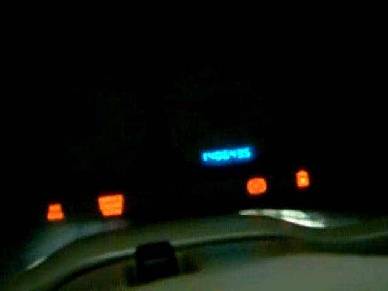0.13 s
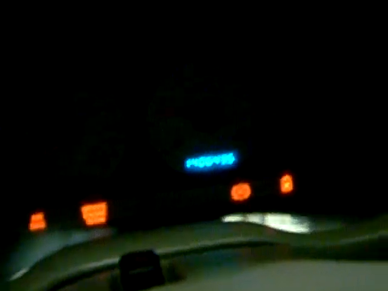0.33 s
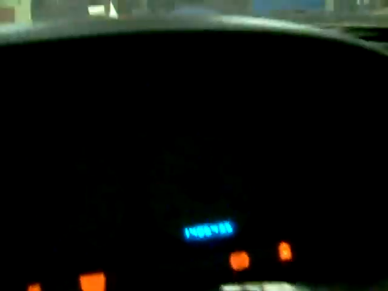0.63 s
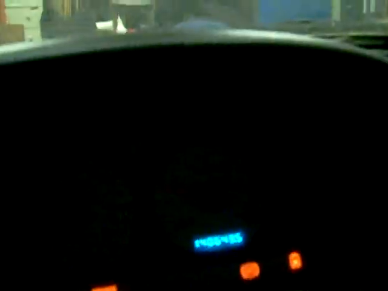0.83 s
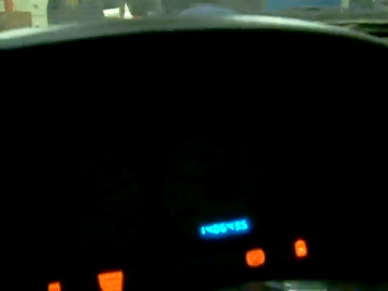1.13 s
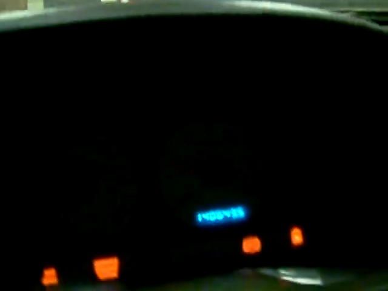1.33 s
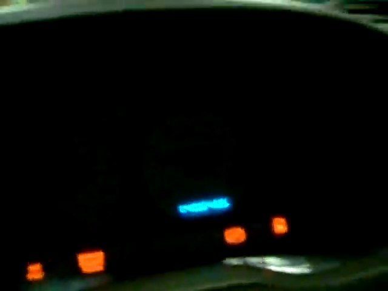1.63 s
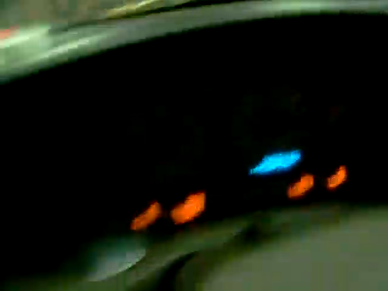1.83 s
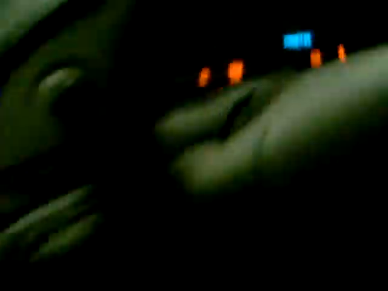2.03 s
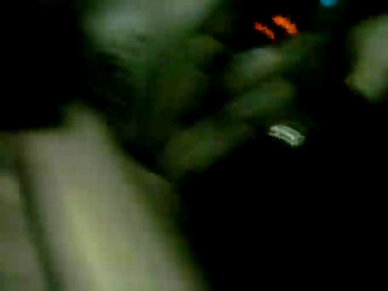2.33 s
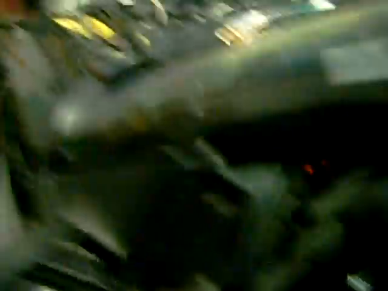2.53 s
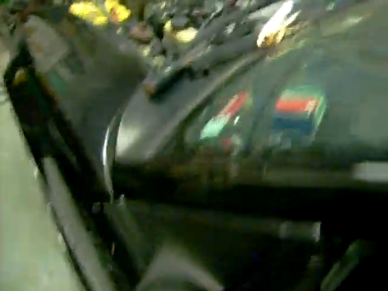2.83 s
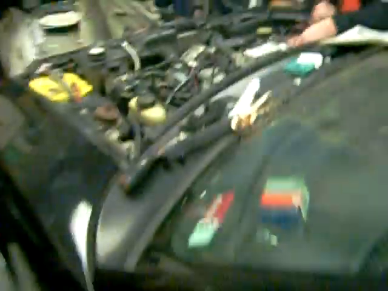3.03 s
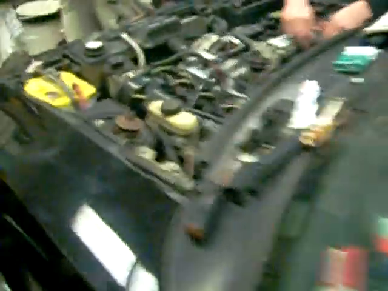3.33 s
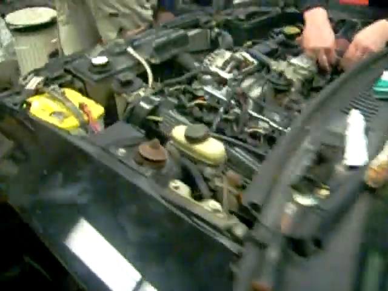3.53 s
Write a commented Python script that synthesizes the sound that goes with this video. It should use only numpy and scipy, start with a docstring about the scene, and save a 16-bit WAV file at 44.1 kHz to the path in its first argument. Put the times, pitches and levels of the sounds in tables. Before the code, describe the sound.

Car engine running at a fast idle, muffled inside the cabin, then revved and clearer outside.

```python
"""Four-cylinder engine, idling and revved

A car engine hunts at a fast idle and is revved once. Its low harmonics boom in the cabin, firing
pulses force the resonances of the exhaust and block, and turbulent air adds a broadband rush.
The microphone moves out of the door toward the open engine bay, where all but the boom and
a few fading tones sound louder and brighter."""
import sys
import numpy as np
from scipy import signal
from scipy.fft import rfft, irfft, next_fast_len
from scipy.io import wavfile
from scipy.ndimage import uniform_filter1d

SR = 44100
rng = np.random.default_rng(int(sys.argv[2]) if len(sys.argv) > 2 else 0)


def generate_wav(signal):
    """Clip the signal to [-1, 1] and save it as 16-bit WAV at the path in sys.argv[1]."""
    frames = np.transpose(np.atleast_2d(signal))
    scaled = np.clip(frames, -1, 1) * 32767
    pcm = np.round(scaled).astype(np.int16)
    wavfile.write(sys.argv[1], SR, pcm)


N = 161847
T = np.arange(N) / SR

# crankshaft speed: t/s, speed/rpm
ENGINE_SPEED = [(0, 1326), (.25, 1318), (.68, 1442), (1.08, 1448), (1.47, 1362), (2.0, 1417), (2.15, 1390),
                (2.47, 1283), (2.65, 1295), (2.8, 1450), (3.0, 1790), (3.1, 1920), (3.22, 1955),
                (3.4, 1750), (3.53, 1570), (3.67, 1580)]
def engine_cycles():
    """Phase is the integral of speed; one four-stroke cycle takes two turns."""
    return np.cumsum(curve(ENGINE_SPEED)) / (2 * 60) / SR


# firing strength of each cylinder: relative level/dB
CYLINDERS = [-2, -4, -2.5, -8]
def firings(cycles, spread_db=3.5, jitter_s=0.00033):
    """Impulse excitation: one pressure pulse per firing, uneven in force and timing."""
    onsets = np.flatnonzero(np.diff(np.floor(cycles * len(CYLINDERS)), prepend=-1))
    force, timing = rng.standard_normal((len(onsets), 2)).T
    onsets = np.clip(onsets + (jitter_s * SR * timing).astype(int), 0, N - 1)
    pulses = np.zeros(N)
    pulses[onsets] = amp(np.resize(CYLINDERS, len(onsets)) + spread_db * force)
    return unit(pulses)


# harmonics of the cycle rate: order, relative level/dB
BOOM_HARMONICS = [(4, -11), (5, 0), (6, -16), (7, -24), (8, -18), (10, -19), (12, -17), (15, -24),
                  (17, -26)]
# cabin boom: t/s, level/dB
BOOM_LEVEL = [(0, -12.5), (.35, -14), (.8, -17.5), (1.25, -17), (1.62, -15.3), (2.1, -17.3), (2.4, -22.5),
              (2.7, -23), (2.82, -19.5), (3.0, -28), (3.67, -34)]
def cabin_boom(cycles, spread_db=1.4):
    """Beating: adjacent low harmonics beat once a cycle, and no two cycles are equally strong."""
    tones = sum(amp(db) * np.sin(2 * np.pi * order * cycles) for order, db in BOOM_HARMONICS)
    count = int(cycles[-1]) + 2
    lope = amp(spread_db * np.interp(cycles, np.arange(count), rng.standard_normal(count)))
    return amp(curve(BOOM_LEVEL)) * unit(tones * lope)


# lowest exhaust resonance, surging in the rev: t/s, relative level/dB
DRONE_LEVEL = [(0, -25), (.95, -22.5), (1.5, -25.5), (1.95, -23), (2.65, -25), (2.73, -15.5), (2.86, -14.5),
               (2.95, -8.5), (3.01, -12), (3.06, -19), (3.1, -7.5), (3.15, -15), (3.24, -9), (3.3, -20),
               (3.42, -21), (3.52, -17.5), (3.61, -13.5), (3.67, -15.5)]
# pitch of the drone outside: t/s, f/Hz
HUM_PITCH = [(2.6, 134), (2.95, 134), (3.22, 131.6), (3.5, 134.2), (3.67, 130.8)]
def exhaust_drone(drive, cycles, outside, throb_depth=0.54, gain_db=-1.96):
    """Forced resonance: the lowest mode throbs once a cycle in the cabin and is a firm hum outside."""
    mode = steady(ring(drive, hz=130.8, width=14))
    hum = unit(np.sin(2 * np.pi * np.cumsum(curve(HUM_PITCH)) / SR))
    drone = steady((1 - outside) * mode + outside * hum, size=5000)
    throb = 1 + throb_depth * (1 - outside) * np.cos(2 * np.pi * cycles)
    return amp(curve(DRONE_LEVEL) + gain_db) * drone * throb


# pipe modes: f/Hz, stage bandwidth/Hz, share of the swing in engine speed that f follows
PIPE_MODES = [(250.6, 12.6, 0.16), (375.2, 13.9, 0.11), (497, 8.2, 0.033)]
# each mode swells and fades as the microphone moves: t/s, level/dB
LOW_MODE_LEVEL = [(0, -25.5), (.25, -27.5), (.35, -24), (1.5, -31), (2.35, -31), (2.53, -26), (2.65, -30),
                  (3.0, -22), (3.2, -23), (3.4, -30), (3.67, -40)]
MID_MODE_LEVEL = [(0, -37), (.7, -36), (1.25, -35), (1.5, -30.5), (2.1, -40), (2.22, -27), (2.55, -29),
                  (2.63, -35.5), (2.72, -24), (2.95, -25), (3.13, -23.5), (3.27, -32), (3.48, -33),
                  (3.6, -25), (3.67, -31.5)]
HIGH_MODE_LEVEL = [(0, -41.5), (.9, -40), (1.28, -35.5), (1.5, -43.5), (1.75, -33), (2.12, -30.5),
                   (2.25, -35), (2.7, -49), (2.92, -33), (3.2, -29.5), (3.42, -45), (3.6, -23), (3.67, -29)]
def exhaust_pipe(drive):
    """Air-column resonance: three modes ring, rising slightly in pitch with engine speed."""
    rpm = curve(ENGINE_SPEED)
    swing = rpm / np.median(rpm) - 1
    levels = (LOW_MODE_LEVEL, MID_MODE_LEVEL, HIGH_MODE_LEVEL)
    pipe = np.zeros(N)
    for level, (hz, width, follow) in zip(levels, PIPE_MODES):
        mode = gliding_ring(drive, hz * (1 + follow * swing), width)
        pipe += amp(curve(level)) * steady(mode, size=5000)
    return pipe


# growl, heard mainly outside: t/s, level/dB
GROWL_LEVEL = [(2.4, -43), (2.7, -38), (2.87, -19), (3.03, -38), (3.3, -35), (3.55, -21), (3.67, -36)]
def growl(cycles):
    """Second harmonic: a tone at twice the firing rate."""
    return amp(curve(GROWL_LEVEL)) * unit(np.cos(2 * np.pi * 2 * len(CYLINDERS) * cycles))


# engine noise, relative band levels: t/s, low mids/dB, high mids/dB, treble/dB
NOISE_BANDS = [(0.06, -38.5, -42.5, -40), (0.11, -38.5, -40, -41.5), (0.14, -41.5, -42.5, -42.5),
               (0.68, -42, -43, -40), (1.49, -41.5, -43.5, -42.5), (2.21, -39.5, -43.5, -38),
               (2.6, -32.5, -35.5, -32), (2.88, -25, -28, -28.5), (3.01, -28.5, -33, -31.5),
               (3.28, -31, -41, -34.5), (3.43, -36, -40.5, -33.5), (3.46, -29.5, -34.5, -29.5),
               (3.61, -28.5, -33.5, -28), (3.63, -29, -38, -28.5)]
# noise spectra inside and outside: f/Hz, relative spectral level/dB
CABIN_SPECTRUM = [(350, -7), (600, 2), (800, -4.5), (960, -7), (1150, -3), (1430, -9.5), (1600, -14),
                  (1800, -14), (2150, -20.5), (2500, -15), (3300, -10), (3900, -9), (4400, -19.5),
                  (5340, -25), (6940, -35), (8500, -41), (11000, -58)]
BAY_SPECTRUM = [(350, -9), (600, -0.5), (810, -13), (1030, -8.5), (1380, -8.5), (1670, -9), (1930, -5.5),
                (2340, -8.5), (3200, -11), (3900, -10), (4400, -17), (5340, -25), (6940, -35), (8500, -41),
                (11000, -50)]
def air_rush(cycles, outside, pulse_depth=0.0475):
    """Turbulence: fan, belt and intake noise pulses with the firings; the car body shades each band."""
    noise = rng.standard_normal(N) * (1 + pulse_depth * np.cos(2 * np.pi * len(CYLINDERS) * cycles))
    cabin, bay = unit(shaped(noise, CABIN_SPECTRUM)), unit(shaped(noise, BAY_SPECTRUM))
    air = (1 - outside) * cabin + outside * bay
    air = air - lowpass(air, edge_hz=560, order=6)
    low, below_treble = lowpass(air, edge_hz=1500), lowpass(air, edge_hz=2800)
    return (amp(curve(NOISE_BANDS, column=1) - 2.0) * steady(low)
            + amp(curve(NOISE_BANDS, column=2) - 0.24) * steady(below_treble - low)
            + amp(curve(NOISE_BANDS, column=3) + 0.16) * steady(air - below_treble))


# modes of the block and covers: f/Hz, stage bandwidth/Hz, relative level/dB
BLOCK_MODES = [(904.4, 48, 0), (960.5, 47, 3), (1010, 45, -0.5), (1118, 85, -10.5), (1339, 52, -6),
               (1480, 61, -5.5), (1877, 38, -9)]
# clatter: t/s, level/dB re the low mids of NOISE_BANDS
CLATTER_LEVEL = [(0, -5), (.45, 1.5), (1.25, 0), (1.5, -1.5), (2.2, -2.5), (2.5, -1), (2.7, -5), (2.92, -3),
                 (3.2, -4.5), (3.67, -6)]
def block_clatter(cycles):
    """Impact excitation: firing knocks and noise of equal power ring the block and its covers."""
    knocks = firings(cycles) + rng.standard_normal(N)
    modes = sum(amp(db) * unit(ring(knocks, hz, width)) for hz, width, db in BLOCK_MODES)
    return amp(curve(NOISE_BANDS, column=1) + curve(CLATTER_LEVEL)) * steady(modes)


# weak body modes: f/Hz, stage bandwidth/Hz, cabin level/dB, outside level/dB
BODY_MODES = [(331.5, 6.7, -57, -57), (357, 13, -44, -37), (466.4, 10.2, -47, -45.5),
              (557.7, 17.6, -50, -36.5), (646.5, 45, -48, -41.5)]
def body_resonance(drive, outside):
    """Forced vibration: the exhaust drives modes whose levels depend on the listening position."""
    return sum(amp(cabin_db + (outside_db - cabin_db) * outside) * steady(ring(drive, hz, width))
               for hz, width, cabin_db, outside_db in BODY_MODES)


# rumble spectrum: f/Hz, relative spectral level/dB
RUMBLE_SPECTRUM = [(8, -14.5), (18, 2), (28, -2.5), (48, -1.5), (75, -21), (115, 1.5), (175, -12.5),
                   (300, -15.5), (600, -23), (900, -38.5), (2000, -57.5)]
# rumble strength: t/s, level/dB
RUMBLE_ENVELOPE = [(0, -29), (2.4, -29), (2.9, -18), (3.3, -22), (3.67, -18.5)]
def body_rumble():
    """Random vibration: the car body shakes at low frequencies under the engine note."""
    return amp(curve(RUMBLE_ENVELOPE)) * unit(shaped(rng.standard_normal(N), RUMBLE_SPECTRUM))


# whirr: t/s, level/dB re the treble of NOISE_BANDS
WHIRR_LEVEL = [(0, -23), (.45, -9), (1.0, -17), (1.3, -17), (2.72, -13), (2.9, -1.5), (3.0, -9),
               (3.67, -15)]
def whirr_and_whine(whine_hz=7418, whine_db=-72):
    """Narrow-band noise is heard as a metallic whirr, a pure tone as a faint steady whine."""
    whirr = steady(ring(rng.standard_normal(N), hz=3757, width=93), size=4000)
    whine = unit(np.sin(2 * np.pi * whine_hz * T))
    return amp(curve(NOISE_BANDS, column=3) + curve(WHIRR_LEVEL)) * whirr + amp(whine_db) * whine


def amp(db):
    """Amplitude ratio of a level in decibels."""
    return 10 ** (np.asarray(db) / 20)


def unit(x):
    """Normalisation to rms 1."""
    return x / np.sqrt(np.mean(x ** 2) + 1e-20)


def steady(x, size=9000):
    """Normalisation of the running rms, smoothed twice over size samples."""
    return x / np.sqrt(abs(uniform_filter1d(uniform_filter1d(x ** 2, size), size)) + 1e-20)


def curve(rows, column=1):
    """Linear interpolation of a table column over time."""
    rows = np.array(rows)
    return np.interp(T, rows[:, 0], rows[:, column])


def colour(x, gain):
    """Filtering as multiplication of the spectrum by gain(f)."""
    size = next_fast_len(N + SR // 2)
    return irfft(rfft(x, size) * gain(np.arange(size // 2 + 1) * SR / size), size)[:N]


def lowpass(x, edge_hz, order=16):
    """Zero-phase low-pass, at half amplitude on the edge."""
    return colour(x, lambda hz: 1 / (1 + (hz / edge_hz) ** order))


def shaped(x, points):
    """Spectral shaping by a table of f/Hz, level/dB."""
    f, db = np.transpose(points)
    return colour(x, lambda hz: amp(np.interp(np.log(hz + 1), np.log(f + 1), db)))


def ring(x, hz, width):
    """Resonance of two like stages in cascade, each width Hz wide."""
    b, a = signal.iirpeak(hz, hz / width, SR)
    return signal.lfilter(b, a, signal.lfilter(b, a, x))


def gliding_ring(x, hz, width):
    """Heterodyning: a two-stage resonance whose centre follows the curve hz."""
    carrier = np.exp(2j * np.pi * np.cumsum(hz) / SR)
    pole = np.exp(-np.pi * width / SR)
    return (carrier * signal.lfilter([(1 - pole) ** 2], np.poly([pole, pole]), x / carrier)).real


# passage of the microphone out of the cabin: start t/s, end t/s
DOOR_PASSAGE = [1.78, 2.7]
def scene(turbulence=0.32):
    """Superposition: the layers add in one channel, the firings timed by one crankshaft."""
    cycles = engine_cycles()
    outside = np.interp(T, DOOR_PASSAGE, [0, 1])
    boom = cabin_boom(cycles)
    drive = firings(cycles) + turbulence * rng.standard_normal(N)  # exhaust gas pressure
    exhaust = exhaust_drone(drive, cycles, outside) + exhaust_pipe(drive)
    bay = block_clatter(cycles) + air_rush(cycles, outside)
    body = body_resonance(drive, outside) + body_rumble()
    return (boom + exhaust + growl(cycles) + bay + body + whirr_and_whine())[None]


def record(dry, ceiling=0.71, edge_hz=11100):
    """Overload and band limiting: the loudest crests clip, then the top treble is cut."""
    taps = signal.firwin(511, edge_hz, window=("kaiser", 9), fs=SR)
    return signal.oaconvolve(np.clip(dry, -ceiling, ceiling), taps[None], "same")


dry = scene()
out = record(dry)
generate_wav(out)
```